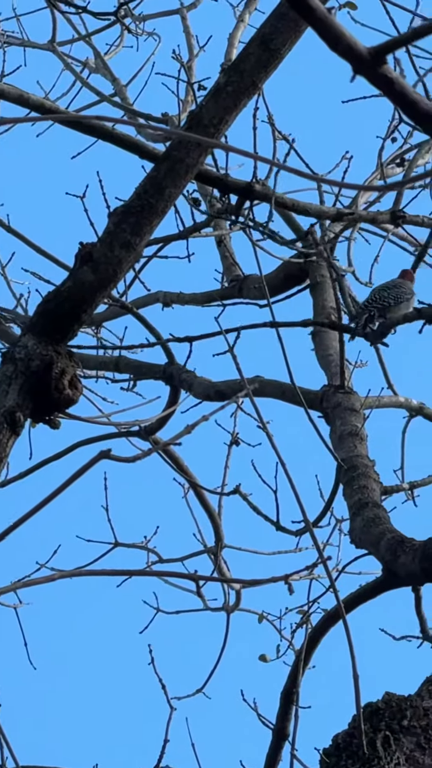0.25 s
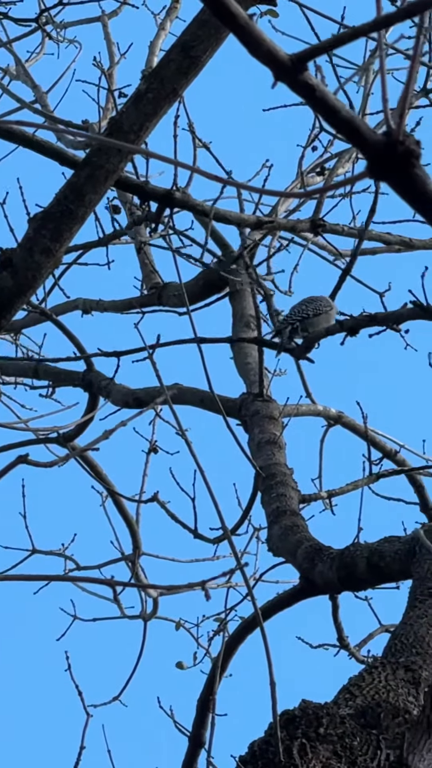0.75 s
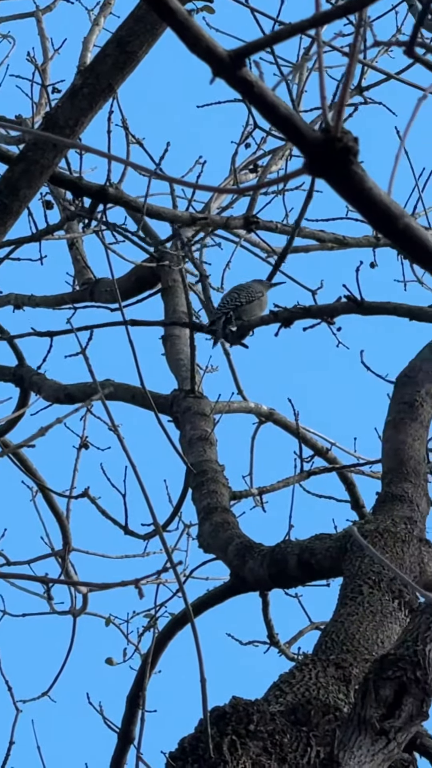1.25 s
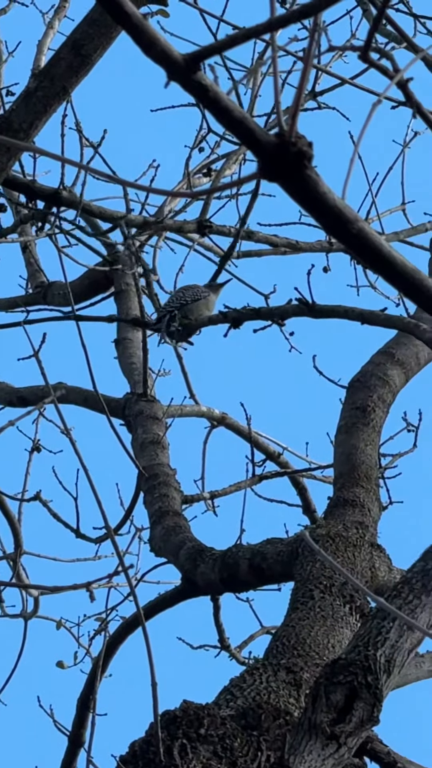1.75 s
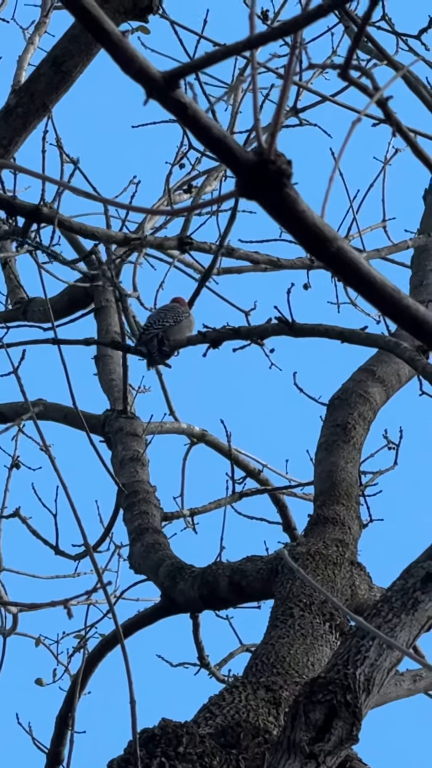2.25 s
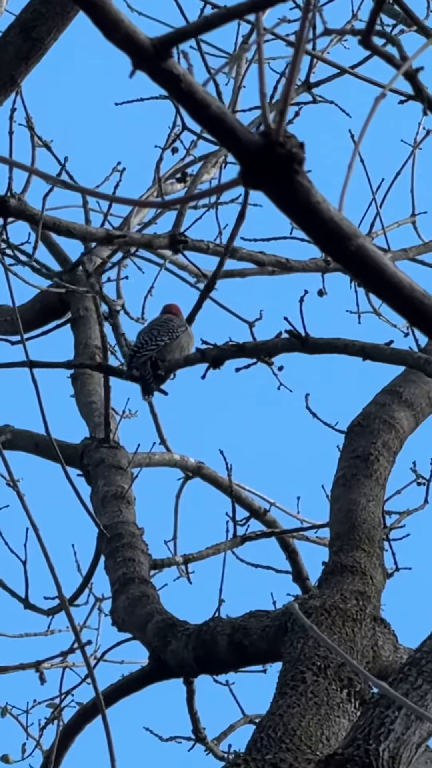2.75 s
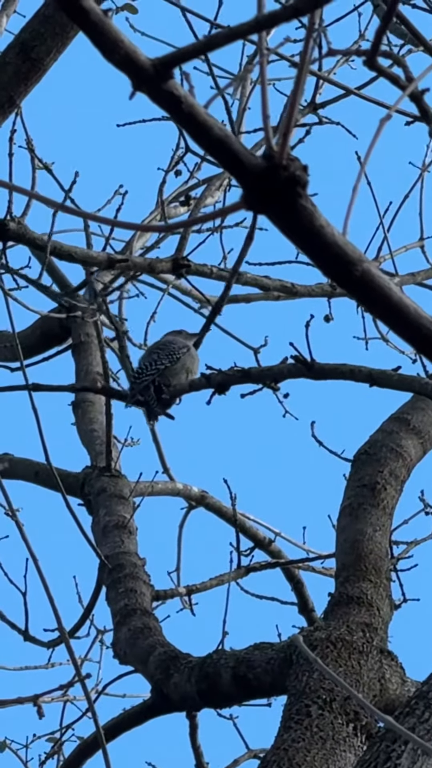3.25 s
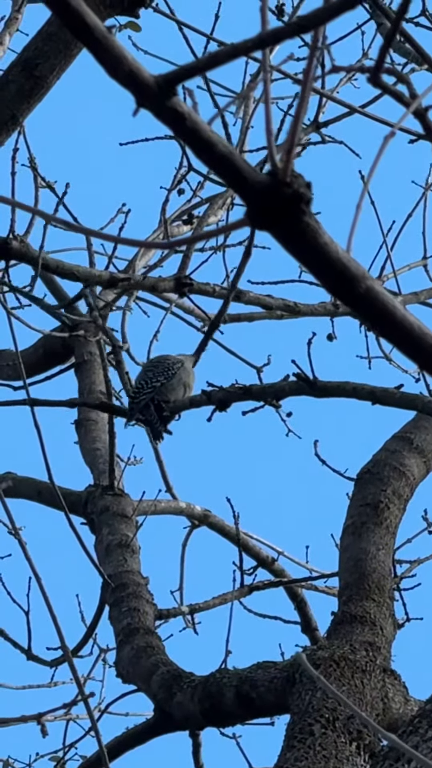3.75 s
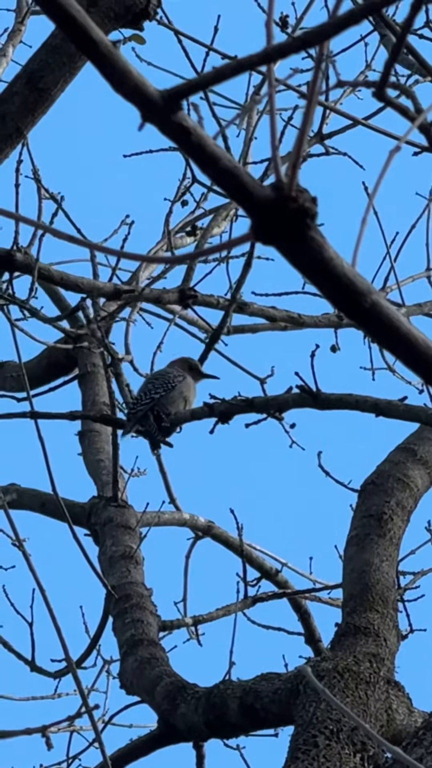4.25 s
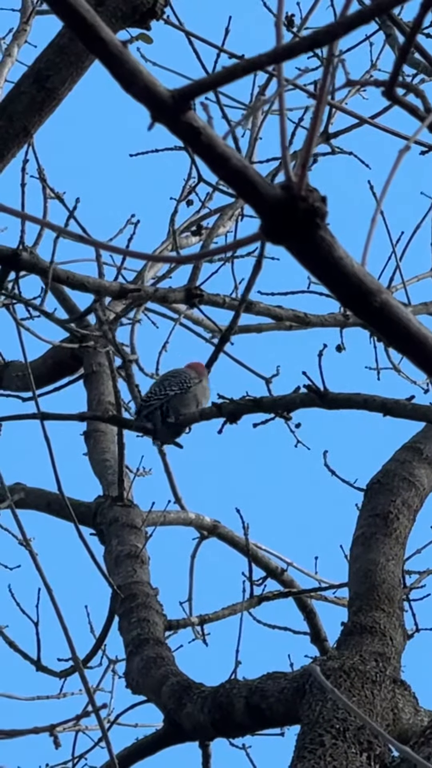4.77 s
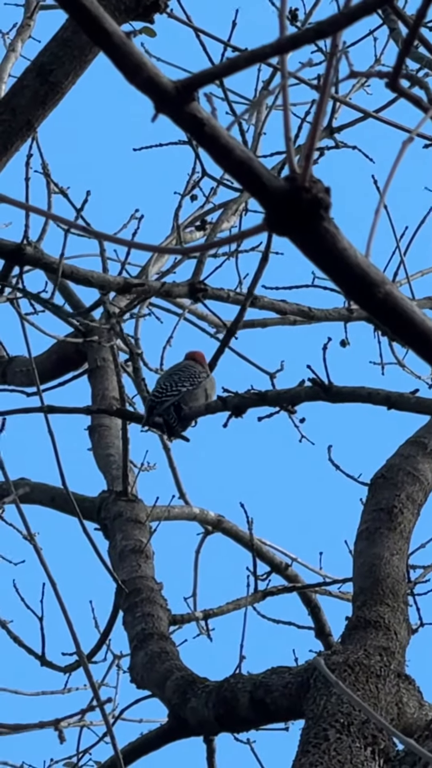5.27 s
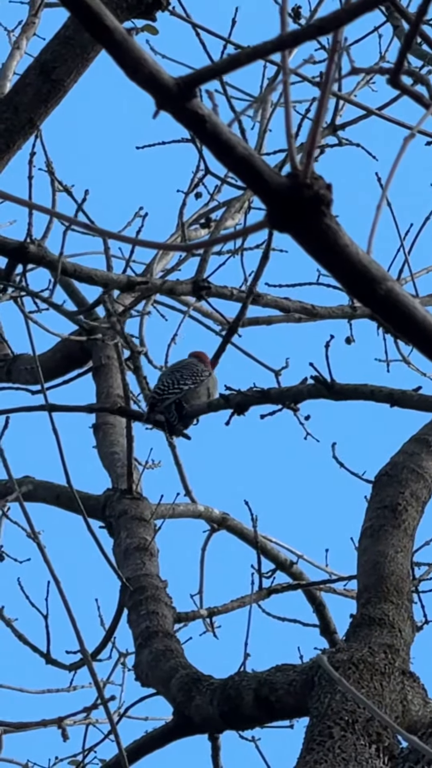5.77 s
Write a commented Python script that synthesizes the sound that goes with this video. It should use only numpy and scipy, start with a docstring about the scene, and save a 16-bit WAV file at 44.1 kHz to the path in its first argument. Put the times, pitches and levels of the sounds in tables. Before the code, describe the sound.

Outdoors among bare trees, wind rumbles low and unevenly against a handheld stereo microphone over a quiet, steady hush. A woodpecker straight ahead calls once, then twice, then three times: short raspy chucks with a brief woody echo. Very thin songbird notes and dry twig ticks are barely heard. Soft handling thuds come midway, and wind swirls wide to both sides near the end.

```python
"""A woodpecker on a bare branch opens with one harsh "chuck", a nasal arch that sinks into a hoarse tail.
Soon come thin, high songbird whistles and ticking twigs, then two more calls close together.
Midway a few soft handling bumps and a distant swell in the mids are heard, then three last calls.
The calls are stacks of harmonics shaped by throat and bill, and the trees answer with decaying noise echoes.
Throughout, coloured noise makes the wind's rumble and a soft hush; near the end the wind swirls wide."""
import sys
import numpy as np
from scipy import signal
from scipy.fft import rfft, irfft, next_fast_len
from scipy.io import wavfile
from scipy.ndimage import uniform_filter1d, map_coordinates

SR = 44100
rng = np.random.default_rng(int(sys.argv[2]) if len(sys.argv) > 2 else 0)


def dump(signal):
    """Clip the signal to [-1, 1] and save it as 16-bit WAV at the path in sys.argv[1]."""
    limited = np.clip(np.atleast_2d(signal).T, -1, 1)
    pcm = np.round(limited * 32767).astype(np.int16)
    wavfile.write(sys.argv[1], SR, pcm)


N = 265085
TOP_HZ = 15800  # nothing sounds above this


def amp(db):
    """Decibels to gain."""
    return 10 ** (np.asarray(db) / 20)


def unit(x):
    """Scale to rms 1."""
    return x / np.sqrt(np.mean(x ** 2) + 1e-20)


def along(points, hz):
    """(frequency [Hz], value) points read on a log frequency axis."""
    f, v = np.transpose(points)
    return np.interp(np.log(hz + 1), np.log(f + 1), v)


def curves(rows, t):
    """Each column after the first, read at the places t of the first."""
    s, *cols = np.transpose(rows)
    return [np.interp(t, s, c) for c in cols]


def wobble(rate, size):
    """A smooth random curve with this rate of random knots a second."""
    knots = rng.standard_normal(size // 20)
    return map_coordinates(knots, [np.arange(size) * rate / SR + 4])


def filtered(x, response):
    """x with its spectrum multiplied by a response of frequency."""
    m = next_fast_len(N + SR // 2)
    hz = np.fft.rfftfreq(m, 1 / SR)
    return irfft(rfft(x, m) * response(hz), m)[..., :N]


def rush(spectrum, alike):
    """Stereo noise of rms 1 with a given colour and left-right likeness (1 same, -1 opposed)."""
    def mid_side(hz):
        """Gains of the shared and the opposed part of the noise."""
        turn = np.arccos(np.clip(along(alike, hz), -1, 1)) / 2
        return amp(along(spectrum, hz)) * [np.cos(turn), np.sin(turn)]

    mid, side = filtered(rng.standard_normal((2, N)), mid_side)
    return unit(np.array([mid + side, mid - side]))


def note(start, length, rise, fall):
    """Sample indices of one note, the time since its start, and a gate that fades it in and out."""
    i = np.arange(int(start * SR) - SR // 50, int(start * SR) + SR // 3)
    t = i / SR - start
    gate = np.exp(np.minimum(t, 0) / rise - np.maximum(t - length, 0) / fall)
    return i, t, gate


# the woodpecker's calls: (start [s], rise [s], fall [s], hold [s], tail [s],
# crest pitch [Hz], held pitch [Hz], tail pitch [Hz], crest level [dB], held level [dB], tail level [dB],
# throat resonance in the rise [Hz], at the crest [Hz], lift of every third harmonic while held [dB],
# roughness at the crest [0-1], while held [0-1], in the tail [0-1],
# bill shift [ratio], treble lift before weighting [dB], whine pitch [Hz], whine level [dB], whine slide [s])
CALLS = [ (0.473, .017, 0.013, .002, 0.067, 577, 523.6, 431.3, -46.5, -42, -49.5, 4080, 4070, 3.3, 0.27, 0.96, 0.67, 0.83, 2.5, 2278, -54, 0.0087),
         (1.9, .017, 0.016, 0.0018, 0.069, 636, 596.7, 434.3, -40, -37, -50, 4800, 3620, 2.2, 0.051, .3, 0.99, 1.015, 1.5, 2448, -52.5, .006),
         (2.195, .019, 0.014, 0.0014, 0.096, 578.7, 529, 429.7, -44, -42, -51, 4370, 3370, 2.6, 0.04, .3, 0.7, 0.884, -2.5, 2205, -51, 0.0033),
         (4.464, 0.012, 0.017, 0.010, 0.064, 661.7, 522.4, 422.5, -43, -34, -46, 5380, 5100, 22, 0.17, .1, .75, 1.05, 0, 2436, -49.5, .008),
         (4.757, .019, 0.013, .001, .089, 623.3, 603.5, 428.7, -41.5, -45, -50.5, 3290, 3500, 2.4, 0.34, .65, 0.82, 1.017, -1, 2296, -52, 0.0069),
         (5.075, .021, 0.0086, 0.00089, 0.13, 568.4, 532.6, 422.2, -47.5, -48.5, -53.5, 4016, 3200, 1.5, 0.67, .92, 1, 0.87, -1.5, 2215, -56.5, .006),
         ]
# colour of the bird's windpipe and open bill: (frequency [Hz], relative level [dB])
BILL_COLOUR = [(600, -32.5), (1000, -13.5), (1250, -0.5), (1530, -5), (1870, -0.5), (2450, 1.5),
               (3150, 2.5), (3800, -4), (4300, -7), (4900, -3), (5750, -10.5), (6400, -11.5), (7000, -7.5),
               (8000, -9.5), (9400, -21.5), (11000, -13.5), (15500, -30)]
BILL_BASE_HZ = 1520  # below this, opening the bill shifts nothing
# how strongly a treble lift acts: (frequency [Hz], weight [ratio])
TREBLE_WEIGHT = [(1200, 0.26), (1800, 0.45), (3300, 0.0), (4700, 1.3), (6000, 1.34), (12000, 2.8)]
# the bill gapes widest at the crest and sends more of the call into the trees
GAPE_ECHO_DB, GAPE_S, CALL_ECHO_DB = 2.5, 0.0087, -2  # extra, half-width, share of the rest


def woodpecker(rasp_hz=420, jitter=0.0087, uneven_db=2.0, dulling_db=7, smear=0.011, soften_db=1.0):
    """Harmonics through throat and bill; returns the direct sound and the share that reaches the trees."""
    direct, scattered = np.zeros((2, N))
    k = np.arange(1, 37)[:, None]  # harmonic numbers
    for start, rise, fall, hold, tail, *voice, shift, treble_db, whine_hz, whine_db, slide_s in CALLS:
        i, t, gate = note(start, rise + fall + hold + tail, rise=0.0038, fall=0.019)
        pitch, db, colour_db, rough = chuck(t, k, rise, fall, hold, tail, *voice)
        # a rougher voice also has a less steady pitch
        hz = k * pitch * (1 + jitter * (0.31 + rough) * wobble(300, len(i)))

        # the tone softens after the crest, and dulls where the pitch lies below 500 Hz
        eased = np.clip((t - rise) / fall, 0, 1)
        dulled = np.clip(np.log2(500 / pitch), 0, 1)
        bright_db = treble_db + soften_db * (1 - eased) - dulling_db * dulled
        tilt_db = bright_db * along(TREBLE_WEIGHT, hz)
        bill_db = along(BILL_COLOUR, hz / shift ** np.clip(hz / BILL_BASE_HZ - 1, 0, 1))
        flicker_db = uneven_db * np.array([wobble(50.2, len(i)) for _ in k])
        size = amp(bill_db + tilt_db + colour_db + flicker_db) * (hz < TOP_HZ)
        # colour alone must not change the loudness
        size = size / np.sqrt(np.sum(size ** 2, axis=0) / 2)

        # irregular vibration smears each harmonic into a narrow band, the high ones most
        rasp = np.array([wobble(rasp_hz, len(i)) + 1j * wobble(rasp_hz, len(i)) for _ in k])
        share = 1 - (1 - rough) ** (.5 + smear * k ** 2)
        swing = np.sqrt(1 - share) + np.sqrt(share / 2) * rasp
        phase = 2 * np.pi * np.cumsum(hz, axis=1) / SR + rng.normal(0, 1.0, k.shape)
        stack = amp(db) * np.sum(size * swing * np.exp(1j * phase), axis=0).real

        call = gate * (stack + whine(t - rise - fall - hold, tail, whine_hz, whine_db, slide_s))
        gape_db = GAPE_ECHO_DB * np.exp(-((t - rise) / GAPE_S) ** 2)
        direct[i] += call
        scattered[i] += call * amp(CALL_ECHO_DB + gape_db)
    return direct, scattered


# uneven harmonics of the voice at the crest of a call: (harmonic [number], lift [dB])
CREST_HARMONICS = [(2, -3), (3, 4), (4, -13), (5, 3), (6, 4), (7, -4.5), (8, 4), (9, -2), (10, 3.5),
                   (11, 2), (13, -2.5)]
# uneven harmonics of the voice at the onset and in the tail: (harmonic [number], lift [dB])
TAIL_HARMONICS = [(2, 4), (3, 7.5), (4, 3), (5, 1.5), (6, 3), (7, 1), (8, 4.5), (9, 1.5), (10, 2),
                  (11, -0.5), (13, 1.5)]
# a call starts flat, soft and hoarse; the throat keeps its first shape until just before the crest
ONSET_PITCH_RATIO, ONSET_DB, ONSET_ROUGH, THROAT_LAG = .77, -15.5, 0.67, 3.1
# then the voice breaks (pitch and colour), drops in level and cracks into hoarseness
BREAK_S, DROP_S, CRACK_S = .0055, 0.0047, .0045
# the tail's pitch sags by this share over its length and wanders, while its level fades
TAIL_SAG, TAIL_WANDER, FADE_DB_PER_S = .12, .012, 61
# throat resonance: lift in each stage, then its place and width
RISE_THROAT_DB, CREST_THROAT_DB, HELD_THROAT_DB, TAIL_THROAT_DB = 16, 11, 16, 4.5
HELD_THROAT_HZ, TAIL_THROAT_RATIO = 3080, 6.4  # the ratio is to the tail pitch
THROAT_WIDTH_HZ, TAIL_WIDTH_HZ = 203, 720
LOCK_FULL_HARMONIC = 10  # every third harmonic gains its full lift from here up


def chuck(t, k, rise, fall, hold, tail, crest_hz, held_hz, tail_hz, crest_db, held_db, tail_db,
          rise_throat_hz, crest_throat_hz, lock_db, crest_rough, held_rough, tail_rough):
    """A voice climbs, settles, holds and breaks: its pitch, level, lift of each harmonic k, roughness."""
    risen = np.clip(t / rise, 0, 1)
    settled = np.sin(np.pi / 2 * np.clip((t - rise) / fall, 0, 1)) ** 2
    in_tail = np.maximum(t - rise - fall - hold, 0)

    def stages(first, crest, held, last, onset=(1 - risen) ** 2, break_s=BREAK_S):
        """A quantity passing through the four stages of the call."""
        arch = crest + (first - crest) * onset + (held - crest) * settled
        return last + (arch - last) * np.exp(-in_tail / break_s)

    def throat(centre_hz, width_hz=THROAT_WIDTH_HZ):
        """How close each harmonic lies to a resonance, 0-1."""
        return 1 / (1 + ((k * pitch - centre_hz) / width_hz) ** 2)

    sag = TAIL_SAG * np.minimum(in_tail / tail, 2)
    sagging_hz = tail_hz * (1 - sag + TAIL_WANDER * wobble(70, len(t)))
    pitch = stages(ONSET_PITCH_RATIO * crest_hz, crest_hz, held_hz, sagging_hz)
    fading_db = tail_db - FADE_DB_PER_S * in_tail
    db = stages(crest_db + ONSET_DB, crest_db, held_db, fading_db, break_s=DROP_S)

    crest_harmonics_db, = curves(CREST_HARMONICS, k)
    tail_harmonics_db, = curves(TAIL_HARMONICS, k)
    rise_colour = RISE_THROAT_DB * np.minimum(2 * risen, 1) * throat(rise_throat_hz)
    rise_colour = rise_colour + (1 - risen) * tail_harmonics_db
    crest_colour = CREST_THROAT_DB * throat(crest_throat_hz) + crest_harmonics_db
    # while held, the voice locks onto every third harmonic
    locked_db = lock_db * (k % 3 == 0) * np.sqrt(np.minimum(k / LOCK_FULL_HARMONIC, 1))
    held_colour = HELD_THROAT_DB * throat(HELD_THROAT_HZ) + locked_db
    tail_resonance = throat(TAIL_THROAT_RATIO * sagging_hz, TAIL_WIDTH_HZ)
    tail_colour = TAIL_THROAT_DB * tail_resonance + tail_harmonics_db
    colour_db = stages(rise_colour, crest_colour, held_colour, tail_colour, onset=1 - risen ** THROAT_LAG)

    rough = stages(ONSET_ROUGH, crest_rough, held_rough, tail_rough, break_s=CRACK_S)
    return pitch, db, colour_db, np.clip(rough, 0, 1)


# the whine loses this share of its pitch over the tail, wanders by a share and frays in phase
WHINE_SAG, WHINE_WANDER, WHINE_FRAY_RAD = .125, .022, .5


def whine(since_break, tail, whine_hz, whine_db, slide_s, flicker_db=1.0):
    """As the voice breaks, one frayed tone slides out of the throat resonance and sinks through the rasp."""
    t = np.maximum(since_break, 0)
    sag = WHINE_SAG * np.minimum(t / tail, 1.5)
    sagging_hz = whine_hz * (1 - sag + WHINE_WANDER * wobble(110, len(t)))
    pitch = sagging_hz + (HELD_THROAT_HZ - whine_hz) * np.exp(-t / slide_s)
    fading = amp(whine_db - FADE_DB_PER_S * t + flicker_db * wobble(120.6, len(t)))
    level = fading * (1 - np.exp(-t / CRACK_S))
    phase = 2 * np.pi * np.cumsum(pitch) / SR + WHINE_FRAY_RAD * wobble(450, len(t))
    return level * np.sqrt(2) * np.sin(phase)


# songbird notes: (start [s], length [s], first pitch [Hz], last pitch [Hz], level before shaping [dB],
# buzz depth [Hz], octave relative to the note [dB], echo relative to the note [dB])
WHISTLES = [ (.71, 0.11, 7950, 7500, -76, 557, -23, 3.5), (1.362, .036, 6450, 7430, -63.5, 450, -23.5, 5.5),
            (2.230, .022, 6400, 7990, -43.5, 59, -26, -9), (2.934, 0.014, 7900, 7240, -65, 40, -29, -6),
            (4.205, 0.061, 3880, 3700, -89.5, 150, -19, -1.5),
            (4.29, 0.075, 3750, 3524, -83, 150, -24, 0.5), (4.405, 0.05, 3500, 3400, -84.5, 130, -26, 1.5),
            (5.01, 0.021, 6000, 7070, -60.5, 404, -0.5, 3.5), (5.023, 0.028, 7230, 7480, -54, 70, -12, 4.5),
            ]
# each note swells from a soft onset over a share of its length, then fades; its level flickers
SEEP_ONSET_DB, SEEP_ATTACK_SHARE, SEEP_FADE_DB, SEEP_FLICKER_DB = -9, 0.4, 5, 2.5
SEEP_BEND = 2.3  # above 1, the glide is fastest at the start


def songbirds(buzz_hz=260):
    """Whistles glide, level off and tremble in pitch; returns direct sound and the share reaching the trees."""
    direct, scattered = np.zeros((2, N))
    for start, length, first_hz, last_hz, level_db, depth_hz, octave_db, echo_db in WHISTLES:
        i, t, gate = note(start, length, rise=0.0016, fall=0.0015)
        done = np.clip(t / length, 0, 1)
        pitch = last_hz + (first_hz - last_hz) * (1 - done) ** SEEP_BEND
        onset_db = SEEP_ONSET_DB * np.maximum(1 - done / SEEP_ATTACK_SHARE, 0)
        db = level_db + onset_db - SEEP_FADE_DB * done
        tremble = np.sin(2 * np.pi * buzz_hz * t + 0.79 * wobble(200, len(i)))
        phase = 2 * np.pi * np.cumsum(pitch + depth_hz * tremble) / SR
        tone = np.sin(phase) + amp(octave_db) * np.sin(2 * phase)
        whistle = gate * amp(db + SEEP_FLICKER_DB * wobble(44, len(i))) * tone
        direct[i] += whistle
        scattered[i] += amp(echo_db) * whistle
    return direct, scattered


# twig ticks: (time [s], level before the boost, fade and colour [dB])
TWIG_TICKS = [(0.859, -63.5), (0.924, -65), (0.9842, -66), (1.109, -68.5), (1.1774, -62.5), (1.6198, -66.5),
              (3.1054, -66.5), (3.349, -70), (3.972, -67), (4.0115, -68)]
# colour of the ticks: (frequency [Hz], level [dB])
TICK_COLOUR = [(2000, -6.5), (6000, -17.5), (10000, -5.0), (15000, -13)]


def twigs(t60=0.055):
    """Faint dry ticks: short bursts of coloured noise with a quick attack and decay."""
    out, t = np.zeros(N), np.arange(SR // 10) / SR
    for s, db in TWIG_TICKS:
        envelope = amp(db + 9.0 - 60 * t / t60) * (1 - np.exp(-t / 0.0026))
        out[int(s * SR):][:len(t)] += envelope * rng.standard_normal(len(t))
    return filtered(out, lambda hz: amp(along(TICK_COLOUR, hz)))


# how long the trees ring: (frequency [Hz], time to fall by 60 dB [s])
TREE_DECAY = [(1000, 0.46), (2300, 1), (3200, 0.78), (4500, 0.6), (7500, 0.41), (14000, 0.32)]


def trees(x, branch_db=3, branch_gap=0.0033):
    """Trunks and branches answer as decaying noise, stronger early on; each stretch has its own tail."""
    out, t = np.zeros(N + 2 * SR), np.arange(SR) / SR
    for start in range(0, N, SR // 3):
        hz, s, z = signal.stft(rng.standard_normal(SR), SR, nperseg=256)
        decay = amp(-60 * s / along(TREE_DECAY, hz)[:, None])
        tail = signal.istft(z * decay, SR, nperseg=256)[1][:SR]
        early = amp(branch_db * np.exp(-(t / 0.045) ** 2))
        tail = tail * (1 - np.exp(-t / branch_gap)) * early
        answer = signal.fftconvolve(x[start:start + SR // 3], tail / np.linalg.norm(tail))
        out[start:start + len(answer)] += answer
    return out[:N]


# soft handling bumps: (time [s], level of the thud that pushes the ports apart before its attack [dB],
# level of the tap common to both before its attack [dB])
HANDLING_BUMPS = [(2.188, -51.5, -68), (2.525, -46, -63), (2.64, -58, -86), (2.765, -55, -89),
                  (3.104, -67, -59), (3.213, -69, -65)]
# colour of the thud: (frequency [Hz], relative level [dB])
THUD_COLOUR = [(60, -7), (170, 5), (300, -2), (550, -12), (850, -7), (1200, -16), (2000, -68)]
# colour of the tap: (frequency [Hz], relative level [dB])
TAP_COLOUR = [(300, -16), (650, -1), (1000, 0.5), (1500, -11.5), (2200, -32), (4000, -50.5)]


def bumps(attack_s=0.0036, t60=0.053):
    """Fingers shift on the microphone: noise bursts make a dull thud through the case and a small tap."""
    t, thud, tap = np.arange(N) / SR, np.zeros(N), np.zeros(N)
    for s, thud_db, tap_db in HANDLING_BUMPS:
        since = np.maximum(t - s, 0)
        blow = 2 * (1 - np.exp(-since / attack_s)) * amp(-60 * since / t60)
        thud += amp(thud_db) * blow
        tap += amp(tap_db) * blow
    return thud * rush(THUD_COLOUR, [(100, -1)]) + tap * rush(TAP_COLOUR, [(100, 1)])


# strength of the swirl before its lumps: (time [s], level of the low part [dB], level of the upper part [dB])
SWIRL_LEVELS = [(0, -88, -91.5), (2.95, -86.5, -85.5), (3.3, -61, -78.5), (3.6, -74.5, -82.5),
                (3.95, -77.5, -87), (4.4, -68.5, -78.5), (4.8, -54.5, -69.5), (5.15, -57, -69),
                (5.28, -51, -68), (5.4, -46.5, -54.5), (5.6, -53.5, -56.5), (5.8, -49.5, -57.5),
                (5.9, -48, -71), (6.0, -56, -59)]
# colour of the low part: (frequency [Hz], relative level per Hz [dB])
SWIRL_LOW_COLOUR = [(15, -14), (40, 5), (90, 2), (160, -8), (280, -22), (700, -73.5)]
# colour of the upper part: (frequency [Hz], relative level per Hz [dB])
SWIRL_UPPER_COLOUR = [(60, -14.5), (180, 4), (400, -4.5), (650, -9), (950, -23), (1500, -69)]


def swirl(lumpy_db=3, lumps_hz=28):
    """Air curling across the microphone in quick lumps drives its two ports in opposition."""
    low_db, upper_db = curves(SWIRL_LEVELS, np.arange(N) / SR)
    opposed = [(100, -1)]
    lumps = unit(amp(lumpy_db * wobble(lumps_hz, N)))
    low = amp(low_db) * rush(SWIRL_LOW_COLOUR, opposed)
    upper = amp(upper_db) * rush(SWIRL_UPPER_COLOUR, opposed)
    return lumps * (low + upper)


# the breeze between gusts: (time [s], level of the rumble before its restlessness [dB])
BREEZE = [(0, -46.5), (.55, -54), (1.0, -49.5), (1.35, -51.5), (1.6, -49.5), (2.2, -50), (2.9, -52.5),
          (3.3, -53), (4.05, -47.5), (4.7, -51.5), (5.15, -52.5), (5.35, -47.5), (5.6, -52.5), (6.0, -48)]
# single eddies that hit the microphone: (time [s], level [dB], length [s])
EDDY_GUSTS = [(0.348, -38.5, 0.025), (0.812, -40, 0.034), (0.903, -38, 0.016), (1.143, -42, 0.013),
              (1.464, -33.5, 0.019), (1.84, -50, 0.028), (1.966, -43.5, 0.017), (2.108, -41.5, 0.03),
              (2.505, -44, 0.018), (3.109, -37.5, 0.074), (3.198, -40, 0.064), (3.33, -46, 0.085),
              (3.514, -39, 0.028), (3.581, -37, 0.072), (3.686, -38.5, 0.017), (3.931, -39, 0.012),
              (4.127, -42, 0.061), (4.343, -48, 0.036), (4.42, -45.5, 0.14), (4.641, -37.5, 0.0082),
              (4.955, -46.5, 0.077), (5.43, -41, 0.047), (5.485, -41, 0.048), (5.729, -45, 0.073),
              (5.891, -41, 0.064), (5.958, -40.5, 0.057)]
# the flutter: (time [s], level of the low mids [dB])
FLUTTER_LEVELS = [(0, -61), (.8, -60), (2.3, -59.5), (2.6, -59), (3.35, -60), (3.65, -58), (4.0, -59),
                  (5.0, -60.5), (5.2, -58), (5.36, -65.5), (5.75, -68.5), (5.84, -59), (6.0, -67)]
# colour of the rumble: (frequency [Hz], relative level per Hz [dB])
BUFFET_COLOUR = [(12, -35.5), (25, -17), (35, -1), (45, -4.5), (57, 6), (80, 2.5), (100, -2.5), (125, -8),
                 (160, -16), (260, -34.5), (1000, -120)]
# colour of the flutter: (frequency [Hz], relative level per Hz [dB])
FLUTTER_COLOUR = [(20, -42), (80, -19), (130, 2), (190, -1), (260, -4.5), (400, -11.5), (800, -22),
                  (3000, -120)]
# colour of the hush: (frequency [Hz], relative level per Hz [dB])
HUSH_COLOUR = [(150, -16), (330, -3.5), (600, -0.5), (900, -3), (1300, -13.5), (2000, -23), (3000, -29.5),
               (4500, -33.5), (9000, -34.5), (12500, -50), (14500, -43), (15500, -50.5)]
# stereo width of the wind: (frequency [Hz], left-right likeness [-1 to 1])
WIND_LIKENESS = [(40, .9997), (110, .999), (200, .98), (350, .88)]
# stereo width of the hush: (frequency [Hz], left-right likeness [-1 to 1])
HUSH_LIKENESS = [(200, .6), (500, .15), (800, .1), (1200, .5), (1800, .93), (5000, .9), (8000, .65),
                 (12000, .4)]
# middle level of the hush, and the share of the low mids' swell that it follows
HUSH_DB, HUSH_FOLLOWS = -66.5, 0.076


def wind(restless_db=2.5, drift_db=0.76):
    """Noise makes low buffeting and flutter, over the fairly steady, broad hush of the surroundings."""
    t = np.arange(N) / SR
    breeze_db, = curves(BREEZE, t)
    flutter_db, = curves(FLUTTER_LEVELS, t)
    eddies = rush(BUFFET_COLOUR, WIND_LIKENESS)
    # even out the eddies, so that the breeze and gusts set the swells
    local_power = uniform_filter1d(np.mean(eddies ** 2, axis=0), size=SR // 14)
    eddies = eddies / np.sqrt(np.abs(local_power) + 0.014)
    gust_power = sum(amp(db) ** 2 * np.exp(-(2 * (t - s) / length) ** 2) for s, db, length in EDDY_GUSTS)
    breeze = amp(breeze_db + restless_db * wobble(22, N))
    buffet = np.sqrt(breeze ** 2 + gust_power) * eddies
    flutter = amp(flutter_db) * rush(FLUTTER_COLOUR, WIND_LIKENESS)
    follow_db = HUSH_FOLLOWS * (flutter_db - flutter_db.mean())
    hush_level = amp(HUSH_DB + follow_db + drift_db * wobble(9.4, N))
    return buffet + flutter + hush_level * rush(HUSH_COLOUR, HUSH_LIKENESS)


# colour of something far off: (frequency [Hz], relative level per Hz [dB])
SWELL_COLOUR = [(300, -27), (600, -6), (870, 6), (1150, -18), (1700, -19), (2600, -46.5)]
SWELL_S, SWELL_LENGTH_S, SWELL_DB = 3.23, 0.3, -70  # middle, length, level at the peak


def swell():
    """Coloured noise rises and falls softly in the mids, as from far off."""
    t = np.arange(N) / SR
    bell = np.exp(-(2 * (t - SWELL_S) / SWELL_LENGTH_S) ** 2)
    return amp(SWELL_DB) * bell * rush(SWELL_COLOUR, [(800, .8)])


# what trunks and branches throw back of the calls: (frequency [Hz], level [dB])
SCATTER_COLOUR = [(1200, -6.5), (1700, -7), (2000, -15.5), (2500, -8), (3100, -14.5), (3400, -12),
                  (3800, -9), (4250, -10), (4650, -6), (5100, -12.5), (5600, -8), (6300, -3), (8000, 2.5),
                  (11000, -12), (14000, -1.5)]
# the part of the echo opposed between left and right: (frequency [Hz], level [dB])
SIDEWAYS_COLOUR = [(1000, 4.5), (1400, -13.5), (2000, -50), (4500, -46.0), (6000, -31.5)]


def scene():
    """Birds and twigs straight ahead, their nearly centred bird echo, the handling and the wind."""
    chucks, outward = woodpecker()
    seeps, scattered = songbirds()
    thrown = filtered(outward, lambda hz: amp(along(SCATTER_COLOUR, hz))) + scattered
    sideways = filtered(trees(thrown), lambda hz: amp(along(SIDEWAYS_COLOUR, hz)))
    echo = trees(thrown) + np.array([sideways, -sideways])
    return chucks + seeps + twigs() + echo + bumps() + swirl() + wind() + swell()


# phase between the two microphone ports: (frequency [Hz], phase difference [rad])
PORT_PHASE = [(2200, 0), (3000, .17), (4000, .13), (4900, .2), (5400, -.4), (6000, -.7), (8000, -1.7),
              (9700, -2.7), (11700, -3.14), (13000, -3.5), (15500, -4.2)]


def record(dry):
    """The two microphone ports drift apart in phase in the treble; nothing is kept above the band limit."""
    def ports(hz):
        """Half the phase difference to each side, up to the band limit."""
        turn = np.outer([.5, -.5], along(PORT_PHASE, hz))
        return np.exp(1j * turn) * (hz < TOP_HZ)

    return filtered(dry, ports)


dry = scene()
out = record(dry)
dump(out)
```